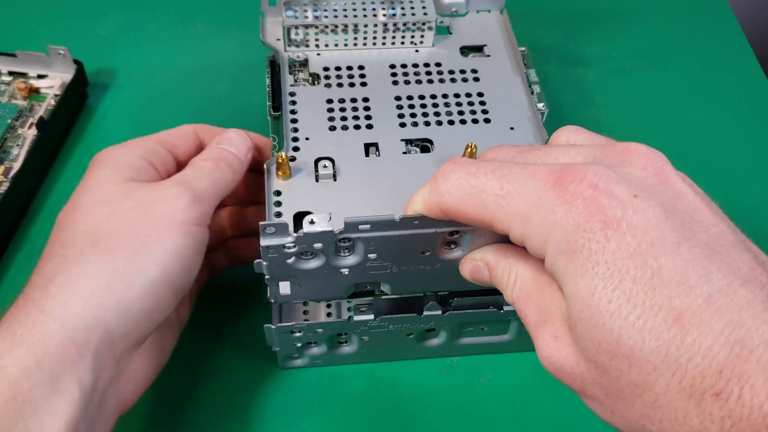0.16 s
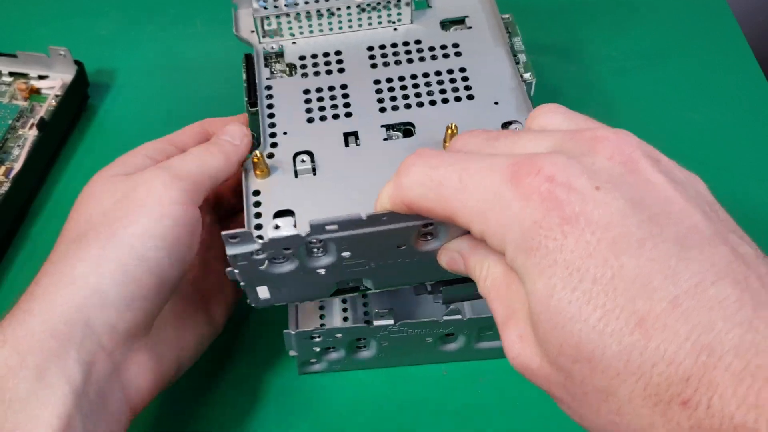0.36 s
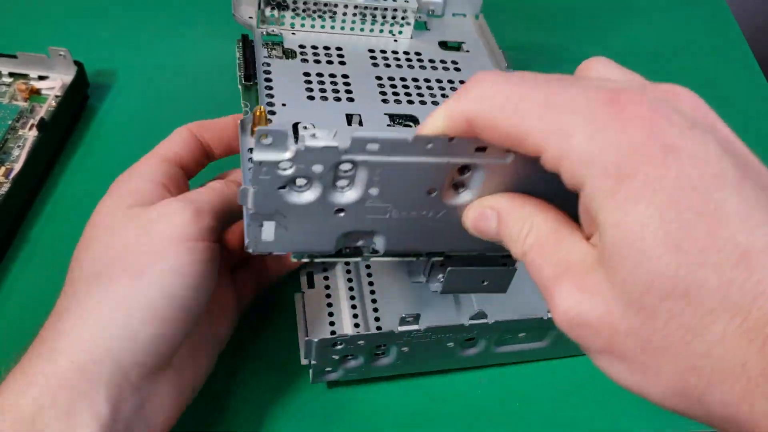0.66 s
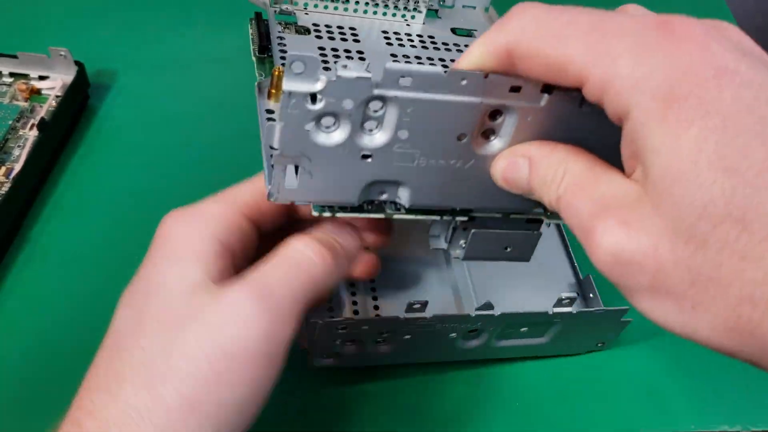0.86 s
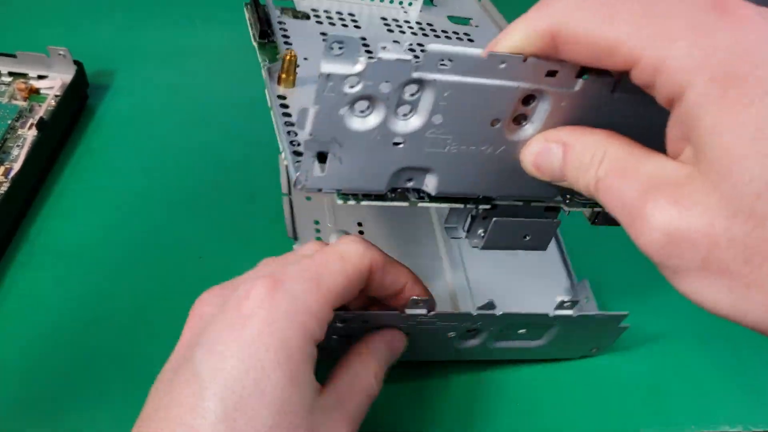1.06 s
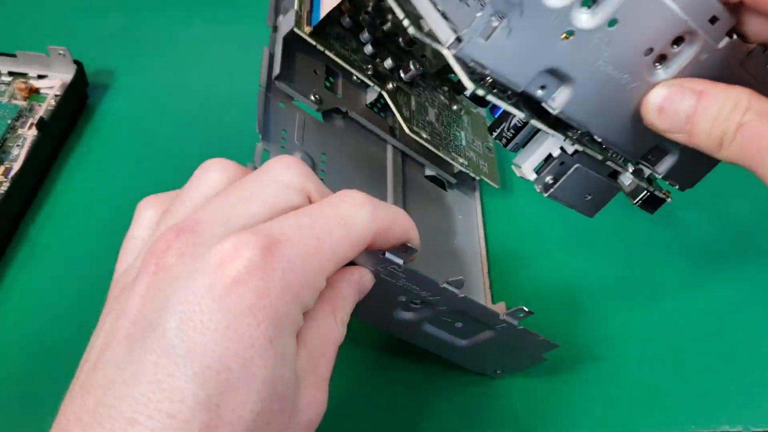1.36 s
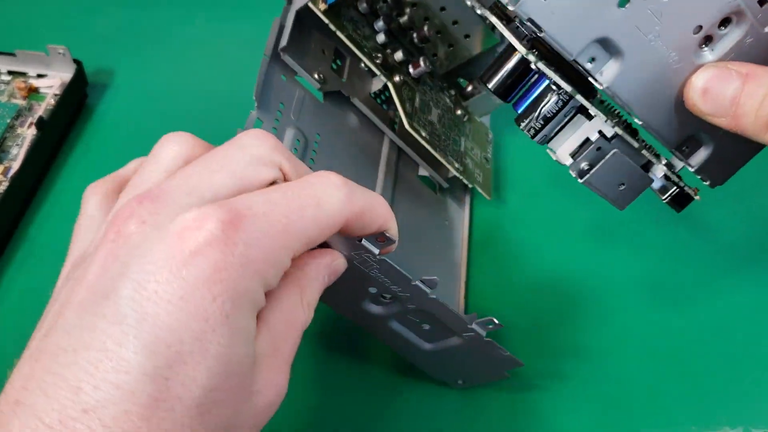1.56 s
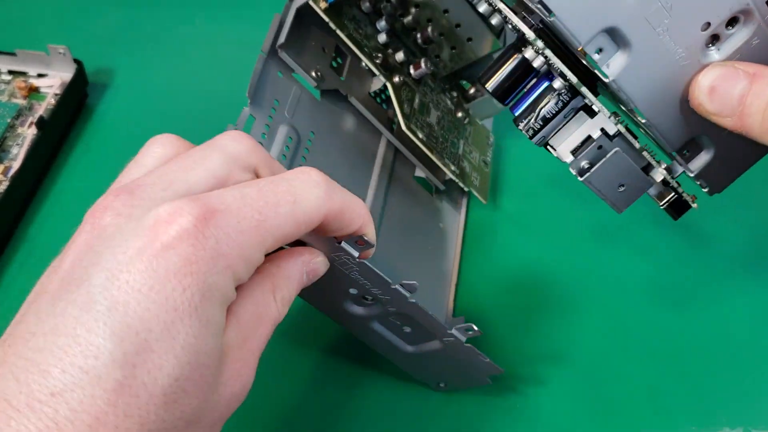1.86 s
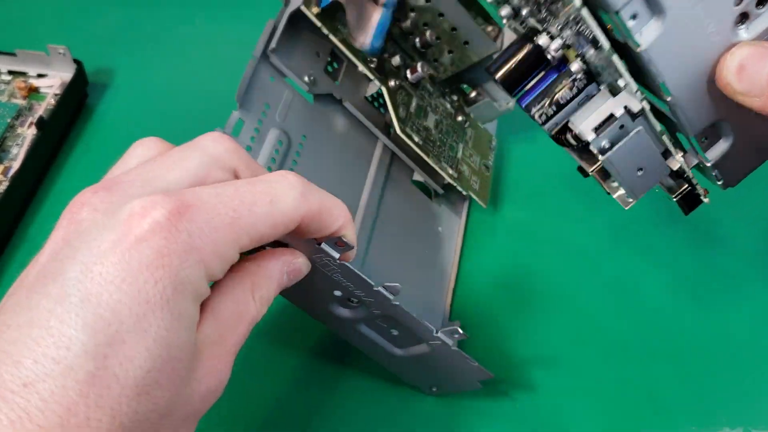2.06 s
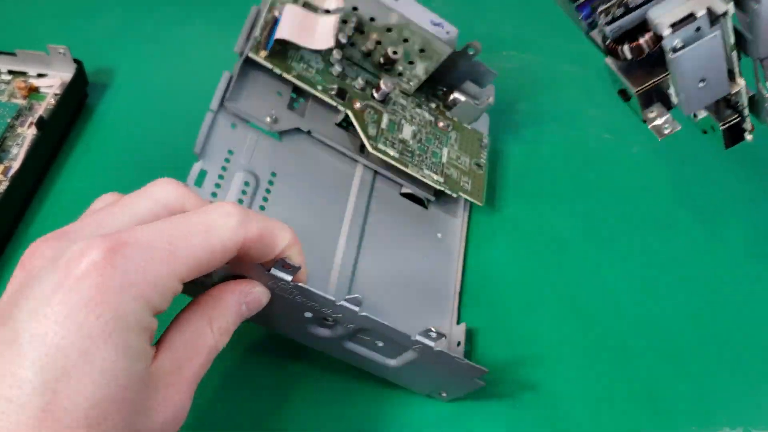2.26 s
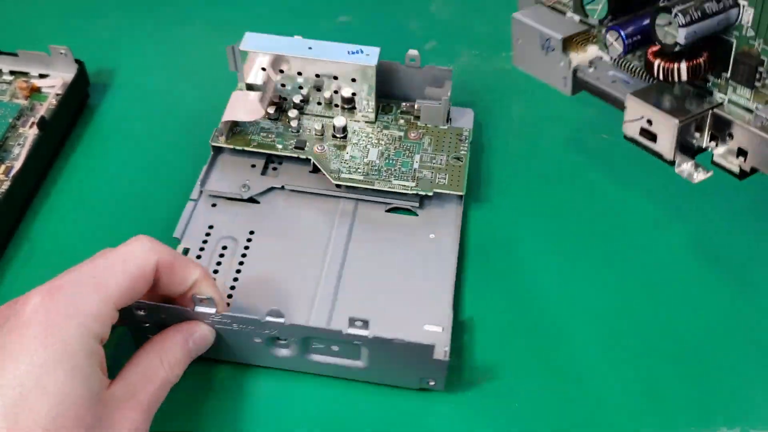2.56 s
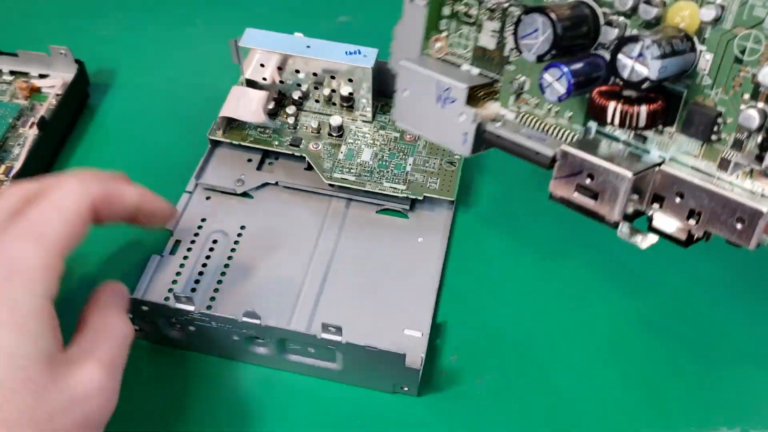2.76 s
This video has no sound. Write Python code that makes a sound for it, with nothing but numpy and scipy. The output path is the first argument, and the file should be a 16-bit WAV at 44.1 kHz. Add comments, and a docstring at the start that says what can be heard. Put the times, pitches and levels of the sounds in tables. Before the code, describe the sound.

Sheet-metal chassis parts clink and clank as they are pulled apart and set down.

```python
"""Sheet-steel chassis halves handled over a table mat in a small quiet room, stereo microphone close.
Light clinks and short scrapes open over a faint hum of air and electronics. From about 1 s the knocks
grow firmer as the halves are pulled apart and turned; near 2.5 s they are set down with the loudest
clanks, and one small clink follows. Each contact is a chatter of tiny impacts that rings the damped
steel tray and the table top, and the room answers briefly."""
import sys
import numpy as np
from scipy import signal
from scipy.fft import rfft, irfft, next_fast_len
from scipy.io import wavfile
from scipy.ndimage import map_coordinates

SR = 44100
rng = np.random.default_rng(int(sys.argv[2]) if len(sys.argv) > 2 else 0)


def wrap_up_sound(samples):
    """Save the sound to the file named by the first command line argument, as 16-bit audio."""
    columns = np.atleast_2d(samples).T
    # keep every value between -1 and 1, then stretch to whole-number steps
    tamed = np.clip(columns, -1, 1)
    steps = np.round(tamed * 32767).astype(np.int16)
    wavfile.write(sys.argv[1], SR, steps)


N = 127890

# Response of the close microphone: (frequency [Hz], gain [dB])
MIC_RESPONSE = [(20, -4.5), (5000, 3), (7400, 0), (8400, -7.5), (10000, -3.5), (12500, 0.5), (15300, 0),
                (15750, 6), (15950, -17.5), (17000, -21.5)]


def contacts():
    """Steel knocks: a first blow, then dying chatter. Returns the bare clicks and what they ring."""
    # Knocks: (time [s], level [dB], thud [dB], body [dB], clank [dB], clink [dB], tick [dB],
    # left over right [dB], chatter t60 [s], chatter level [dB], snap pitch [Hz], snap level [dB])
    knocks = [(0.169, -43, -18, -9, -23, -13, -8, 6, 0.022, -17, 3500, -18),
              (0.242, -34.5, -25, -17.5, -7, -11, -15, 1.5, 0.025, -5.5, 1080, 0),
              (0.299, -42, -18.5, -9.5, -20, -9, -6, 7, 0.02, -21, 3170, -7),
              (0.567, -49.5, -21, -13.5, -12, -4.5, 1, 15, 0.02, -19, 4150, -8.5),
              (0.571, -57, -39, -20, -29, -16, -12, 8, 0.026, -14, 4200, -13),
              (0.592, -45, -18, -28, -16, -22, 3, 6, 0.02, -25, 6040, -5),
              (0.608, -28, -15.5, -4, -2.5, -12, -6, 7.5, 0.026, -25, 2330, -12),
              (0.617, -33, -7, -2.5, -23, 1, -1, 2.5, 0.06, -14, 3040, -8),
              (0.955, -50, -17.5, 7.5, -10, -13, -8, 2, 0.032, -16, 2370, -13),
              (0.965, -40.5, -31.5, -17, -6, -23, -18, 12.5, 0.032, -9.5, 3260, -9),
              (1.026, -25.5, -33.5, -22, -12.5, -9.5, -7.5, 7, 0.024, -8.5, 3420, -9.5),
              (1.091, -15, -21.5, -11, -6, -19.5, -23, 2, 0.011, -7.5, 1410, 2),
              (1.1, -28.5, -40, -8.5, -5, -9, -5, 1, 0.036, -3, 1320, -23),
              (1.115, -25, -20, -10.5, -13, -3, -17.5, 2.5, 0.016, -25, 1470, -13.5),
              (1.336, -35.5, -12.5, -0.5, -14.5, -27, -23, 2, 0.028, -9, 1130, -11.5),
              (1.354, -36.5, -14.5, -7, -14, -13.5, -14, 2.0, 0.017, -19, 1480, -5),
              (1.406, -24, -21.5, -4, -4.5, -5, -18.5, 2, 0.013, -11, 3230, -5),
              (1.648, -35, -13, -5.5, -12, -6.5, -6.5, 4.0, 0.049, -14.5, 5820, -8.5),
              (1.8, -40, -9.5, -0.5, -5.5, -14, -17.5, 2.5, 0.017, -6, 1510, -1.5),
              (1.822, -30, -17, -10.5, -6, -5, -48, 4, 0.016, -16.5, 3270, -4.5),
              (2.037, -31, -13, -37, -12, -5, -18.5, 10.5, 0.02, -20, 3370, -4.5),
              (2.046, -21, -26.5, -31.5, -13.5, -11.5, -10.5, -2, 0.023, -6, 3450, -4.5),
              (2.055, -20, -25, -21, -21, -5, -21, 3, 0.015, -4.5, 3800, -16.5),
              (2.064, -32.5, -23.5, -36.5, -19.5, 0, -17.5, 10, 0.027, -12, 3220, -16),
              (2.114, -29, -30, -35, -12.5, -29, -8.5, 2.5, 0.016, -4, 2280, -11),
              (2.3, -49, -15, -17.5, -23.5, -18.5, -7, 7, 0.017, -9.5, 2550, -12.5),
              (2.389, -56, -8, -8, -1, -12, -20.5, 7, 0.013, -22, 2590, -6),
              (2.447, -43.5, -17, -6, 5.5, -2.5, -3.5, 2, 0.02, -13, 1280, -8),
              (2.458, -5.5, -43, -16, -3, -5, -33, 5, 0.0088, -12, 1390, -20.5),
              (2.468, -6.5, -25.5, -18.5, -4, -12, -6.5, 2.5, 0.026, -11, 1290, -11),
              (2.475, -12, -23, -19, -13, -7.5, -18.5, 1.5, 0.06, -7.5, 1460, -11.5),
              (2.596, -5.5, -23.5, -18, -6.5, -11.5, -34, 2.5, 0.0067, -17, 1194, -6.5),
              (2.606, -22, -8.5, -15, -6, -30.5, -18.5, -0.5, 0.02, -15, 1210, -13.5),
              (2.754, -46, -29, -30, -12, -6.5, -8, 9, 0.023, -20, 1394, -9.5)]
    # Modes of the table top: (frequency [Hz], level [dB], t60 [s])
    table_modes = [(113, -18.5, 0.45), (166, -2.5, 0.27), (208.4, -1, 0.17), (364, 1, 0.15)]
    click_db, tray_db, table_db = 15.5, -4, -32.5
    snap_t60_s, flight_s = 0.0069, 0.0013
    out, t = np.zeros((2, 2, N + SR)), np.arange(SR // 3) / SR
    table_ring = sum(damped_sine(t, *mode) for mode in table_modes)
    for start, db, *colour_db, pan_db, chatter_t60, chatter_db, snap_hz, snap_db in knocks:
        clicks = amp(db + click_db) * colour(contact_force(t, chatter_t60, chatter_db), colour_db)
        ring = amp(tray_db) * signal.fftconvolve(clicks, tray_ring())[:len(t)]
        ring += amp(table_db) * signal.fftconvolve(clicks, table_ring)[:len(t)]
        ring += damped_sine(t, snap_hz, db + snap_db, snap_t60_s)  # the first blow's pitched snap
        arrival = round((start + flight_s) * SR)
        out[..., arrival:arrival + len(t)] += [placed(clicks, pan_db), placed(ring, pan_db)]
    return out[..., :N]


def contact_force(t, t60, chatter_db, per_s=2000):
    """One unit blow, followed by tiny impacts that fade as the steel settles."""
    force = amp(-60 * t / t60) * impacts(len(t), per_s, spread_db=7.5)
    force /= np.linalg.norm(force) + 1e-9
    force *= amp(chatter_db) * np.sqrt(t60 * per_s) / 2
    force[0] = 1
    return force


def colour(force, gains_db):
    """The tone of a knock: thud, body, clank, clink and tick bands each get their gain."""
    edges_hz = [85, 300, 1000, 3000, 7000, 18000]
    out = np.zeros_like(force)
    for db, low, high in zip(gains_db, edges_hz, edges_hz[1:]):
        band = signal.butter(2, (low, high), "band", fs=SR, output="sos")
        out += amp(db) * np.sqrt(4000 / (high - low)) * signal.sosfilt(band, force)
    return out


def tray_ring():
    """The steel tray's ring at unit energy; every blow stirs the modes differently."""
    # Main modes of the tray: (frequency [Hz], level [dB], t60 [s])
    main_modes = [(502, -2, 0.11), (987, -11, 0.21), (1200, -11, 0.058), (1281, -5.5, 0.092),
                  (1510, -24.5, 0.02), (2006, -12, 0.13), (2480, -6, 0.14), (3012, -11, 0.23),
                  (3422, 6.5, 0.05), (3970, -4.5, 0.19), (4536, -5.5, 0.14), (5000, -11, 0.11),
                  (7050, -15, 0.18)]
    lesser_db, lesser_t60_s = -17, 0.13
    t = np.arange(SR // 4) / SR
    # Lesser modes, 0.7 to 9 kHz, change with the grip and the place of the blow.
    lesser_modes = [(700 * 13 ** pitch, lesser_db, lesser_t60_s * (0.5 + decay))
                    for pitch, decay in rng.random((36, 2))]
    modes = list(main_modes) + lesser_modes
    ring = sum(damped_sine(t, hz, db + rng.normal(0, 1.8), t60) for hz, db, t60 in modes)
    return ring / np.linalg.norm(ring)


def scrapes():
    """Edges rub in strokes of dense grit. Returns the bare rubbing and the tray ring it drives."""
    # Strokes: (time [s], length [s], start level [dB], end level [dB], tilt about 5 kHz [dB/octave])
    strokes = [(0.067, 0.062, -77, -55.5, 0), (0.124, 0.051, -60.5, -58.5, -1.5),
               (0.2, 0.064, -63.5, -66, -3), (0.304, 0.067, -77.5, -75.5, -3),
               (0.609, .13, -42.5, -63.5, -1.5), (0.752, .15, -73, -79.5, 0),
               (0.95, 0.036, -60.5, -48.5, -2.5), (1.032, 0.095, -50, -55.5, -0.5),
               (1.081, 0.2, -51, -63.5, -3), (1.382, 0.036, -55.5, -53, -1), (1.396, 0.17, -55, -74.5, -3),
               (1.942, 0.14, -80.5, -63, -3), (2.039, 0.036, -40, -37, 2.5),
               (2.242, 0.083, -73.5, -84.5, -1)]
    fade_s, ring_db, pan_db = 0.0067, -2.5, 2
    rub, t = np.zeros(N), np.arange(N) / SR
    grit = unit(impacts(N, per_s=2500, spread_db=4))
    for start, length, start_db, end_db, tilt in strokes:
        end = start + length
        fade = np.clip(np.minimum(t - start, end - t) / fade_s, 0, 1)
        stroke = grit * fade * amp(np.interp(t, [start, end], [start_db, end_db]))
        rub += filtered(stroke, lambda hz: amp(tilt * np.log2(np.maximum(hz, 100) / 5000)) * (hz > 90))
    rasp = peaky(rub)
    ring = amp(ring_db) * signal.fftconvolve(rub, tray_ring())[:N]
    return placed(rasp, pan_db), placed(ring, pan_db)


def sheet_haze(clicks):
    """The sheet's dense small modes blur each click into a brief wash of noise."""
    # Decay of those modes: (frequency [Hz], t60 [s])
    decay = [(100, 0.018), (1000, 0.017), (4000, 0.049), (14000, 0.036)]
    # Their stereo image: (frequency [Hz], left-right likeness [0-1])
    likeness = [(100, 1), (500, 1), (1500, 0.23), (4000, 0.2), (15000, 0.2)]
    haze = afterglow(clicks, decay, likeness, frame=64, delay_s=0.00081)
    return amp(8) * highpass(haze, low_hz=348)


def room_tail(direct):
    """The small room answers a few milliseconds late, favouring many narrow pitches."""
    # Reverberation: (frequency [Hz], t60 [s])
    decay = [(100, 0.22), (500, 0.13), (2000, 0.21), (6000, 0.24), (15000, 0.31)]
    # Its stereo image: (frequency [Hz], left-right likeness [0-1])
    likeness = [(100, 1), (400, 0.28), (1200, 0.13), (4000, .1), (15000, 0.05)]
    tail = afterglow(direct, decay, likeness, frame=256, delay_s=0.0046)
    return peaky(amp(0.5) * highpass(tail, low_hz=204))


def room_tone():
    """Air and electronics: faint noise and a few fuzzy tones, sinking a little at the end."""
    # Noise spectrum as heard through the microphone: (frequency [Hz], relative density [dB])
    spectrum = [(35, -41), (60, 5.5), (262, -25), (371, -15.5), (448, -10.5), (579, -14.5), (842, -14),
                (968, -30.5), (1740, -17), (3040, -10.5), (4320, -29), (9350, -23), (16000, -37)]
    # Stereo image of noise and hum: (frequency [Hz], left-right likeness [0-1])
    likeness = [(30, .85), (300, .8), (1000, .4), (4000, 0.25), (15000, 0.05)]
    # Hum tones: (frequency [Hz], width [Hz], level [dB])
    hum = [(32.3, 9, -67.5), (121, 14, -77.5), (426, 60, -73), (2400, 500, -78.5)]
    # Slow drift of the whole bed: (time [s], gain [dB])
    drift = [(0, 0.5), (.8, 0.5), (1.7, 2), (2.4, 0.5), (2.75, -4), (2.9, -5)]
    hiss = filtered(stereo_noise(likeness),
                    lambda hz: amp(along(spectrum, hz) - along(MIC_RESPONSE, hz)) * (hz > 50))
    bed = amp(-68) * unit(hiss)
    for centre, width, db in hum:
        tone = filtered(stereo_noise(likeness), lambda hz: 1 / (1 + (2 * (hz - centre) / width) ** 2))
        bed += amp(db) * unit(tone)
    return bed * amp(np.interp(np.arange(N) / SR, *np.transpose(drift)))


def afterglow(x, decay, likeness, frame, delay_s):
    """Noise fed by the energy of x, each frequency dying at its own speed."""
    hz, t, spectra = signal.stft(x, SR, nperseg=frame)
    kept_per_hop = amp(-120 * (t[1] - t[0]) / along(decay, hz))
    power = np.stack([signal.lfilter([1 - kept], [1, -kept], abs(spectra[:, i]) ** 2)
                      for i, kept in enumerate(kept_per_hop)], axis=1)
    noise = signal.stft(stereo_noise(likeness), SR, nperseg=frame)[2]
    noise /= np.sqrt(np.mean(abs(noise) ** 2))
    glow = signal.istft(noise * np.sqrt(power), SR, nperseg=frame)[1]
    return np.pad(glow, ((0, 0), (round(delay_s * SR), 0)))[:, :N]


def impacts(size, per_s, spread_db):
    """Sparse random impulses of uneven strength."""
    struck = rng.random(size) < per_s / SR
    strength = amp(spread_db * np.minimum(rng.exponential(1, size), 3))
    return struck * strength * rng.choice([-1, 1], size)


def damped_sine(t, hz, db, t60):
    """One mode, falling 60 dB in t60 seconds."""
    return amp(db - 60 * t / t60) * np.sin(2 * np.pi * hz * t)


def placed(x, pan_db, left_lead_s=5e-5):
    """x at the stereo microphone: slightly earlier on the left, with pan_db of left over right."""
    sides = np.array([[1], [-1]])
    arrived = filtered(x, lambda hz: np.exp(1j * np.pi * hz * left_lead_s * sides))
    return arrived * amp(sides * pan_db / 2)


def stereo_noise(likeness):
    """Left and right white noise, as alike at each frequency as the curve says."""
    def mid_side_gains(hz):
        angle = np.arccos(along(likeness, hz)) / 2
        return np.array([np.cos(angle), np.sin(angle)])
    mid, side = filtered(rng.standard_normal((2, N)), mid_side_gains)
    return np.array([mid + side, mid - side])


def peaky(x, spread_db=3, width_hz=35):
    """x through a comb of random narrow peaks and dips."""
    knots = np.clip(rng.standard_normal(2000), -2, 2)
    return filtered(x, lambda hz: amp(spread_db * map_coordinates(knots, [hz / width_hz], mode="mirror")))


def highpass(x, low_hz):
    """x with the bass rolled off under low_hz."""
    return signal.sosfilt(signal.butter(3, low_hz, "high", fs=SR, output="sos"), x)


def filtered(x, response):
    """x through a response given as a function of frequency."""
    size = x.shape[-1]
    padded = next_fast_len(size + 4096)
    return irfft(rfft(x, padded) * response(np.fft.rfftfreq(padded, 1 / SR)), padded)[..., :size]


def along(points, hz):
    """A (frequency, value) curve read on a log frequency axis."""
    knots_hz, values = np.transpose(points)
    return np.interp(np.log(hz + 1), np.log(knots_hz + 1), values)


def amp(db):
    return 10 ** (np.asarray(db) / 20)


def unit(x):
    return x / np.sqrt(np.mean(x ** 2) + 1e-20)


def scene():
    """Knocks and scrapes up close, the room behind them."""
    clicks, ring = contacts() + scrapes()
    direct = clicks + ring
    return direct + sheet_haze(clicks) + room_tail(direct) + room_tone()


def record(dry):
    """The close microphone colours the sound and passes nothing above 17.1 kHz."""
    return filtered(dry, lambda hz: amp(along(MIC_RESPONSE, hz)) * (hz < 17100))


dry = scene()
out = record(dry)
wrap_up_sound(out)
```